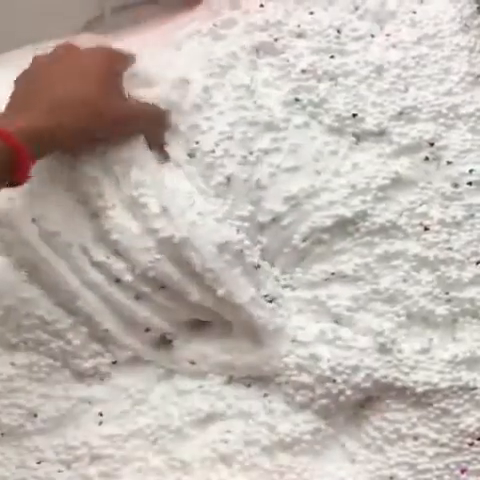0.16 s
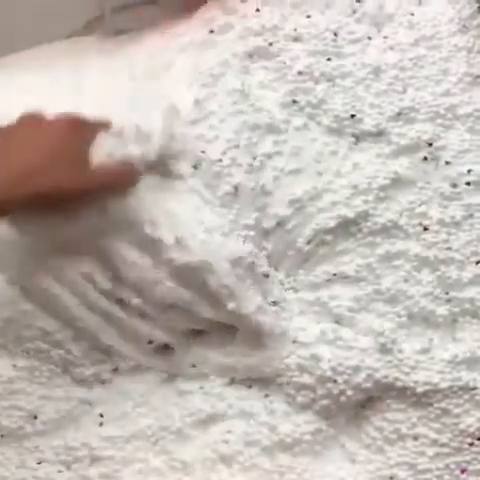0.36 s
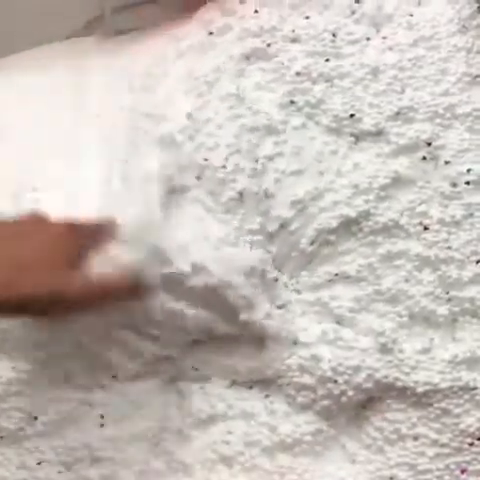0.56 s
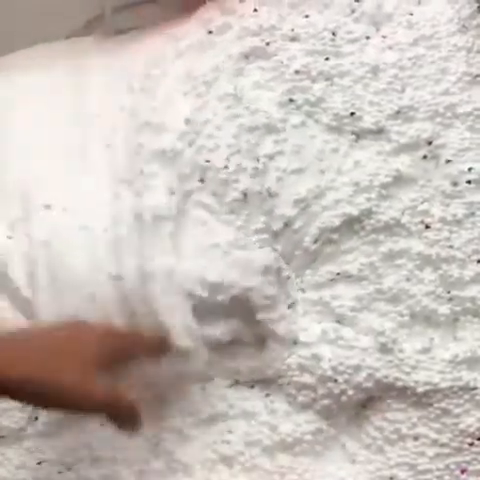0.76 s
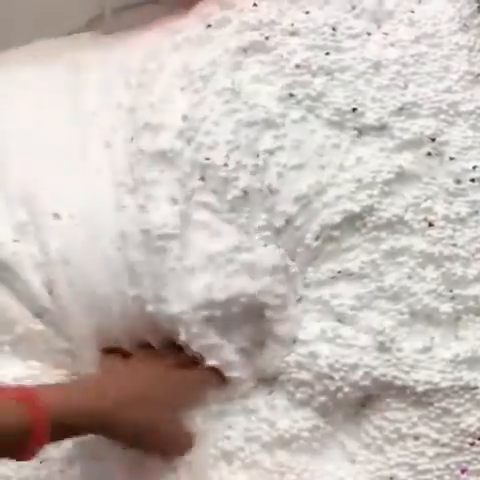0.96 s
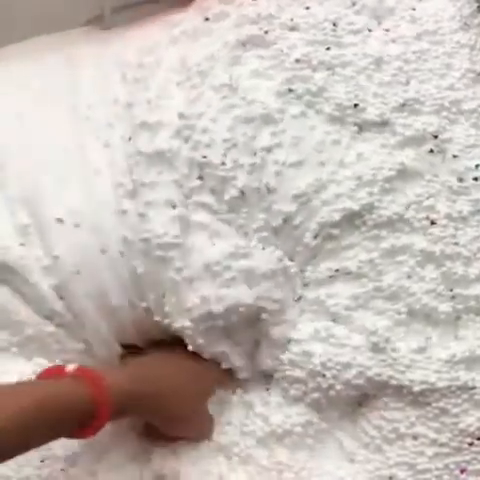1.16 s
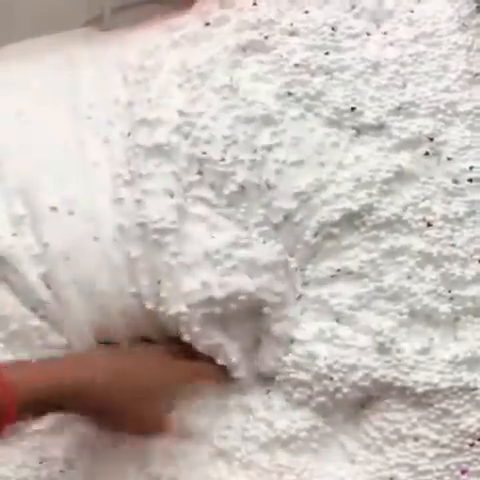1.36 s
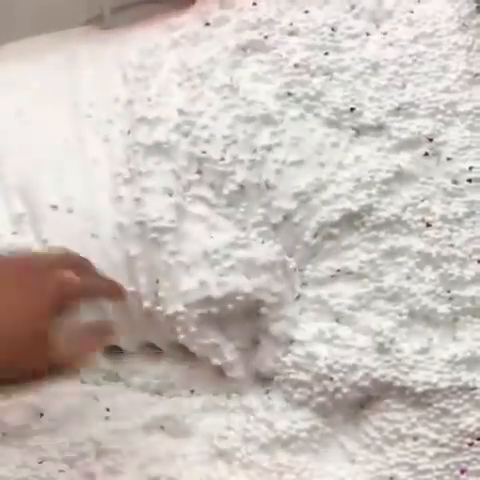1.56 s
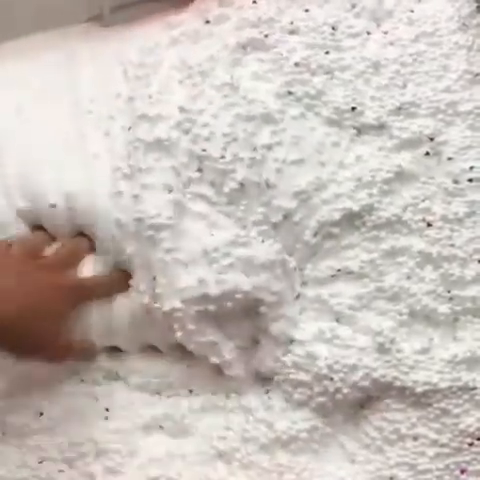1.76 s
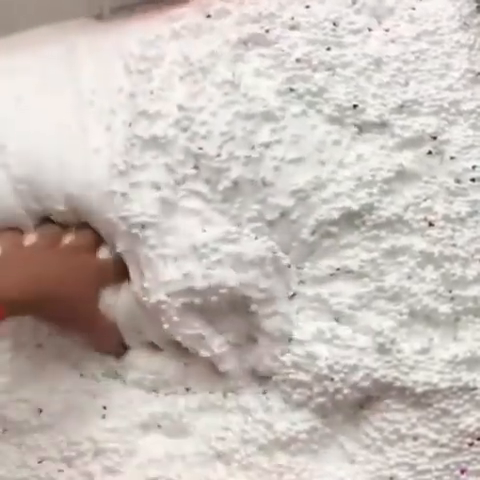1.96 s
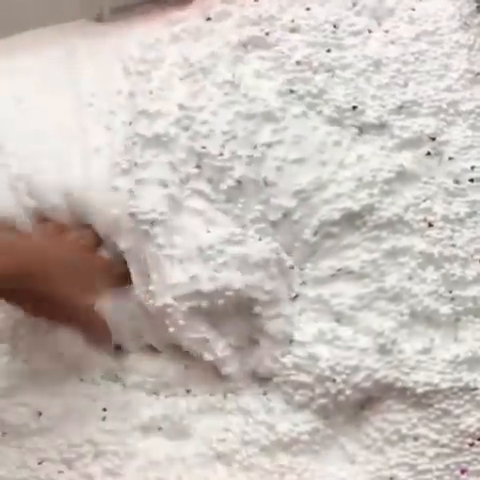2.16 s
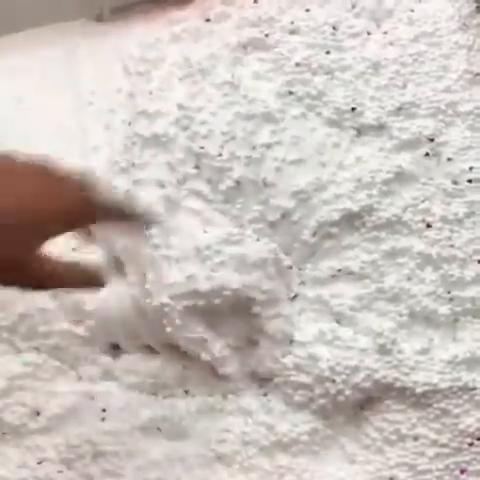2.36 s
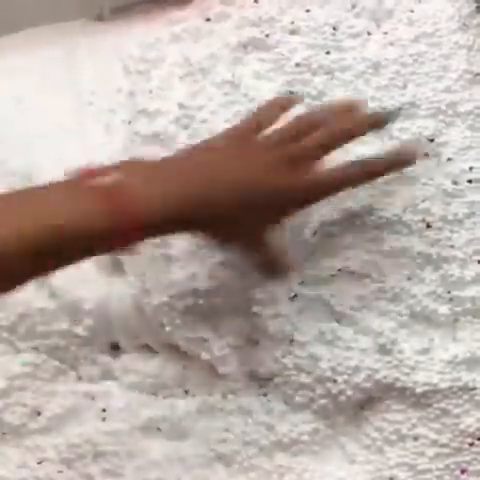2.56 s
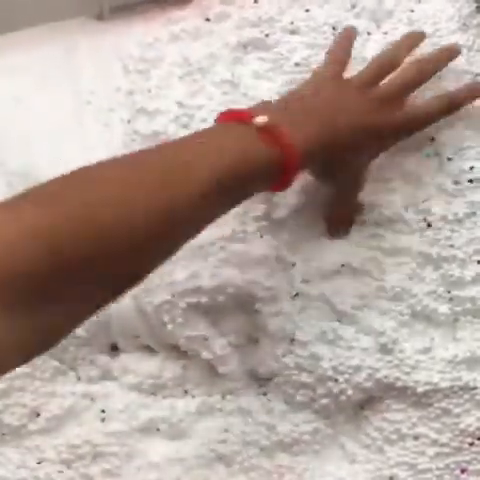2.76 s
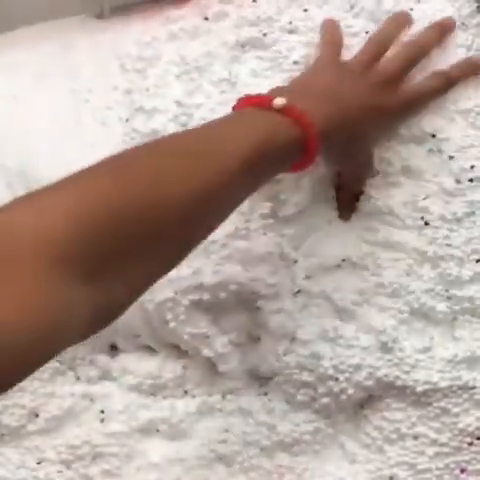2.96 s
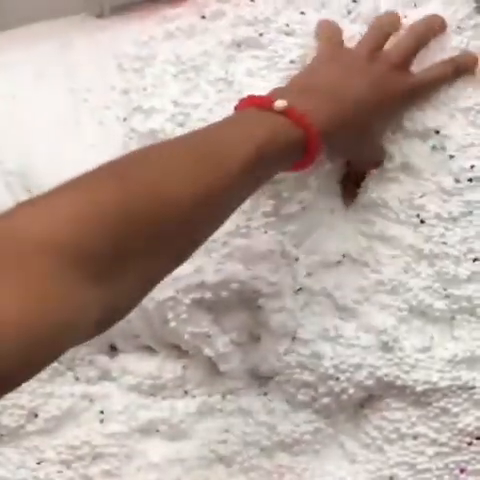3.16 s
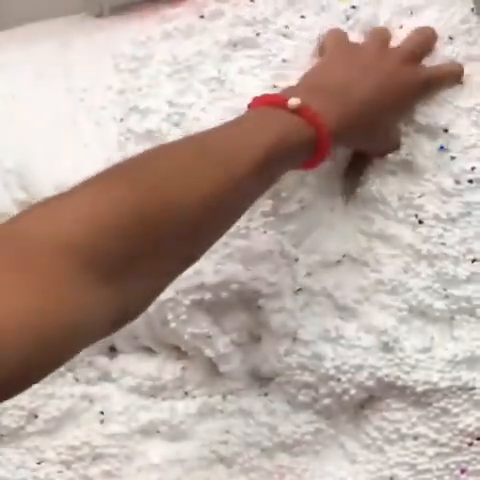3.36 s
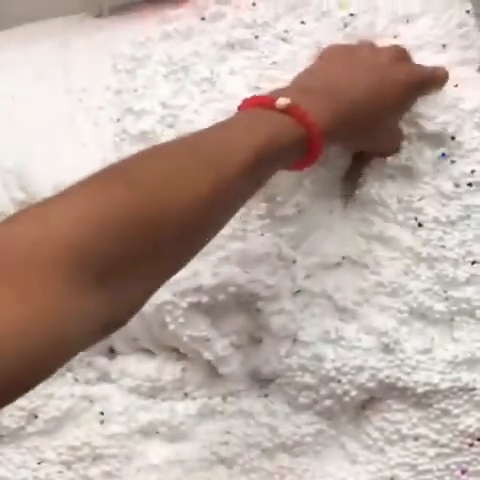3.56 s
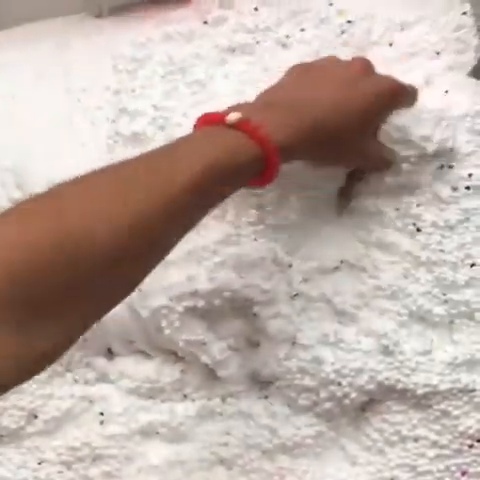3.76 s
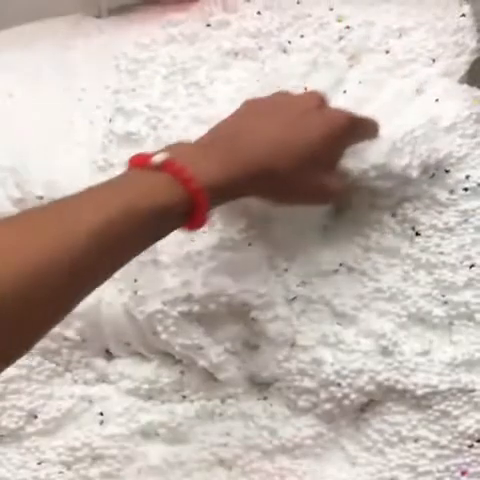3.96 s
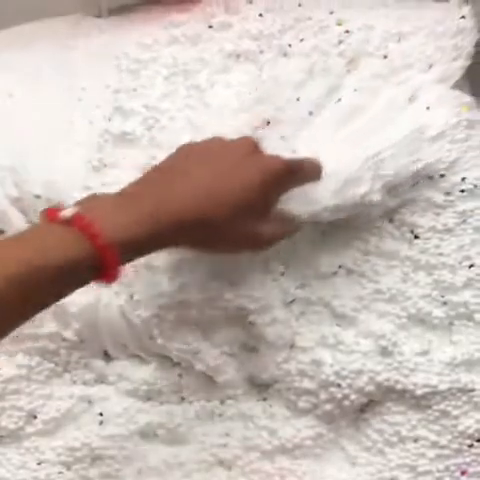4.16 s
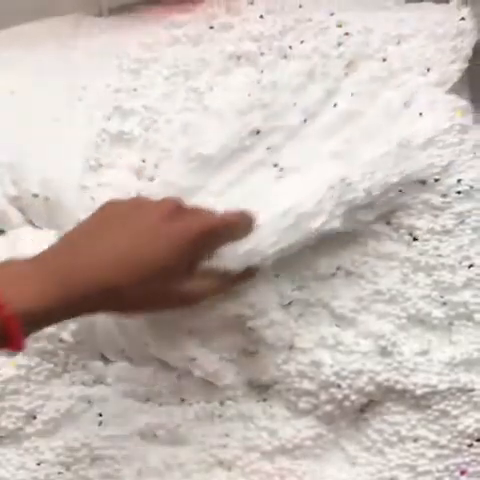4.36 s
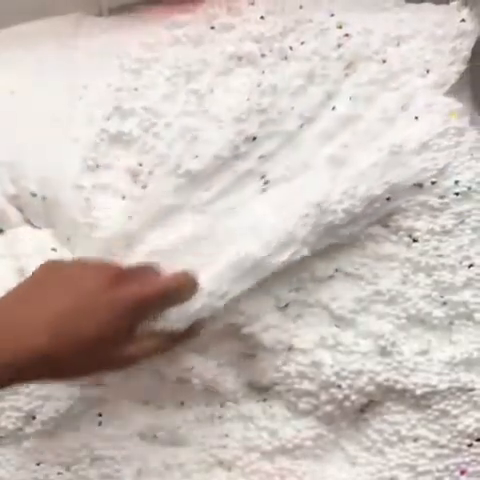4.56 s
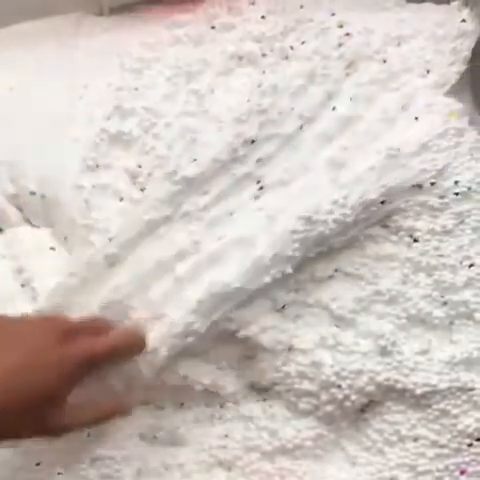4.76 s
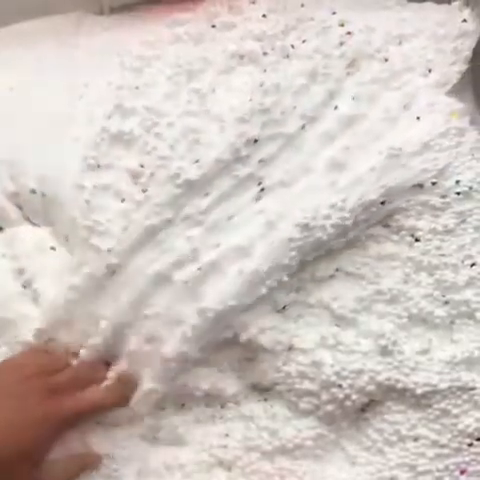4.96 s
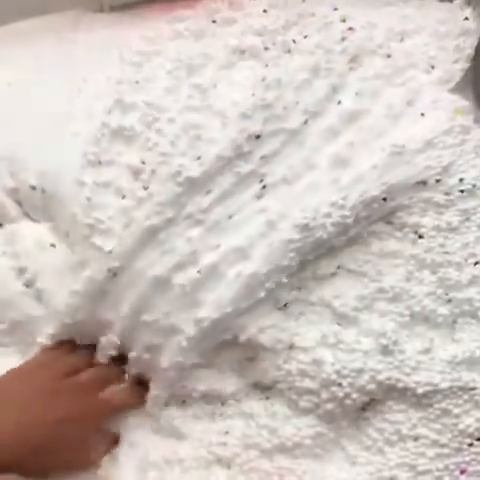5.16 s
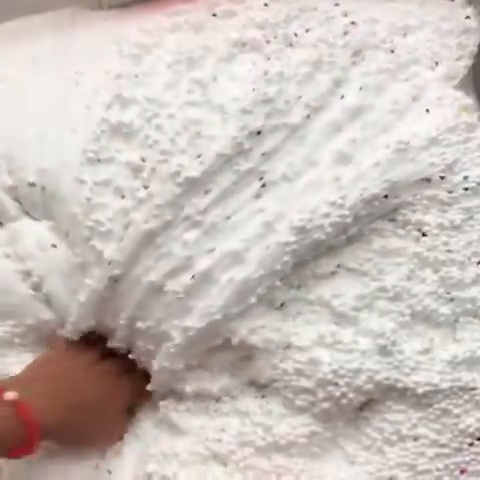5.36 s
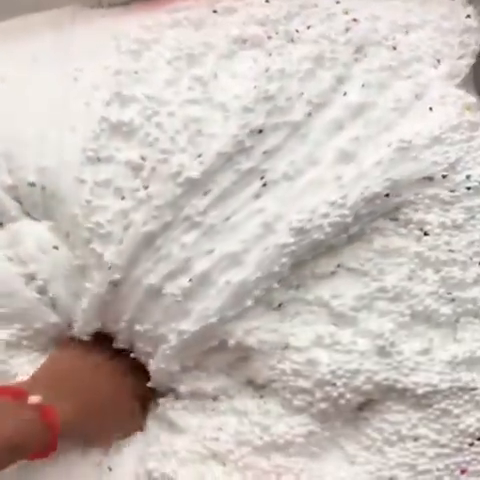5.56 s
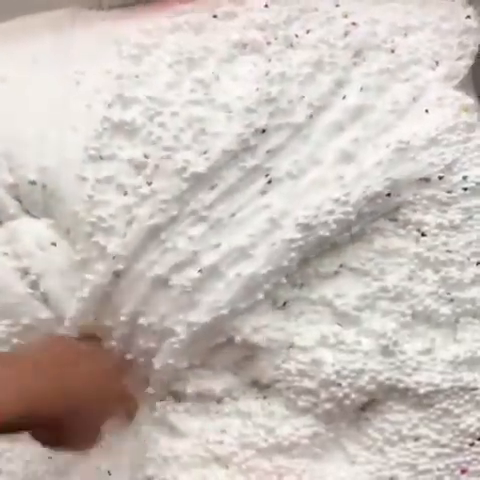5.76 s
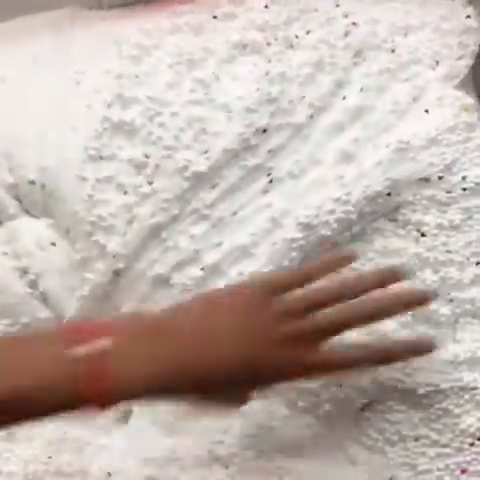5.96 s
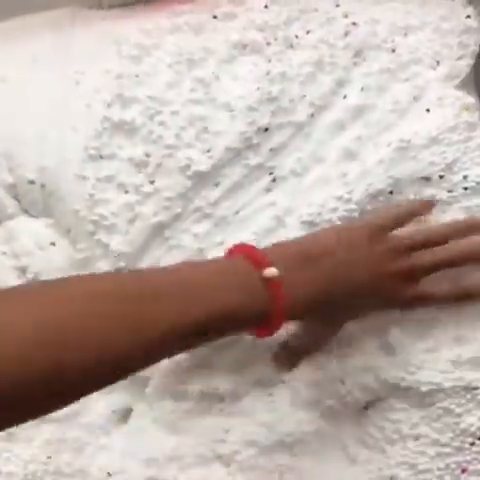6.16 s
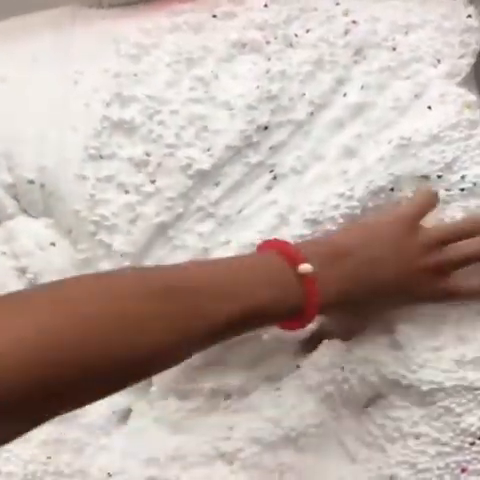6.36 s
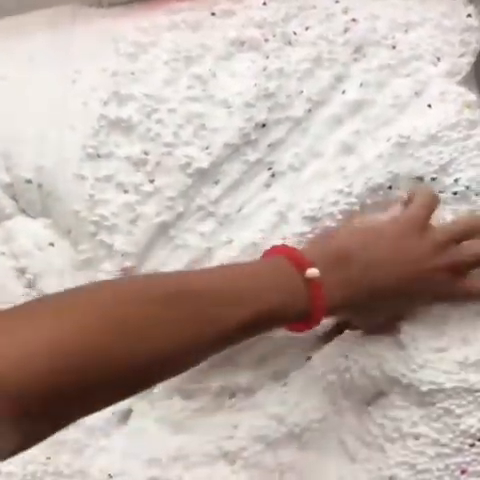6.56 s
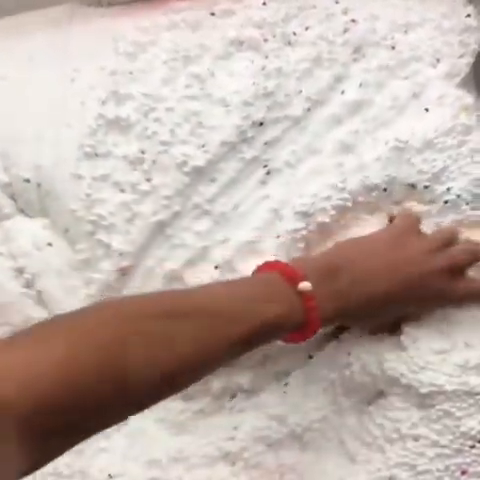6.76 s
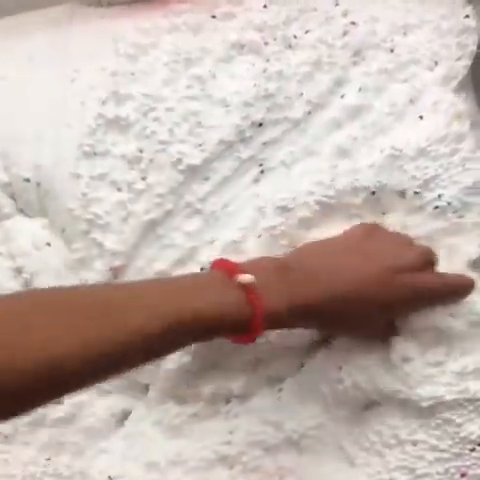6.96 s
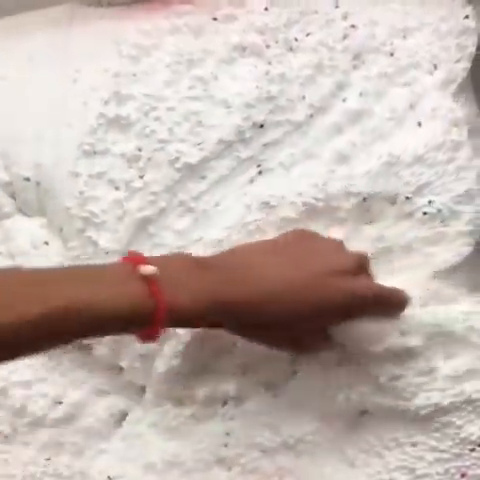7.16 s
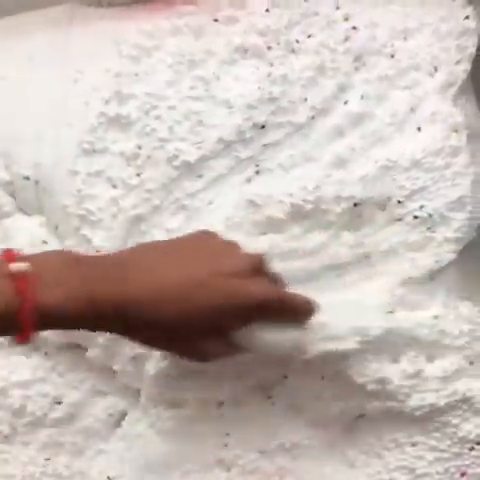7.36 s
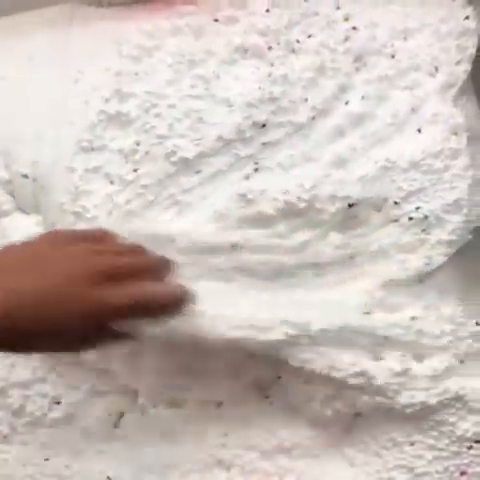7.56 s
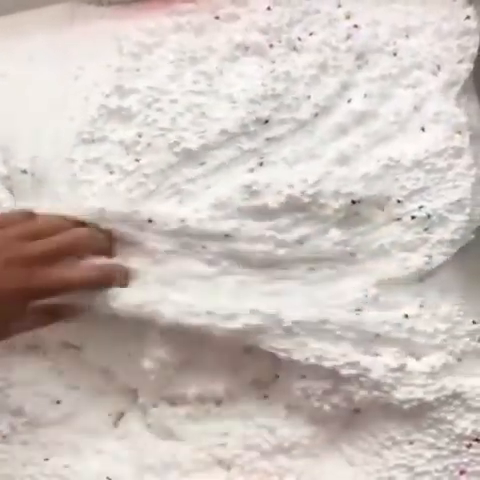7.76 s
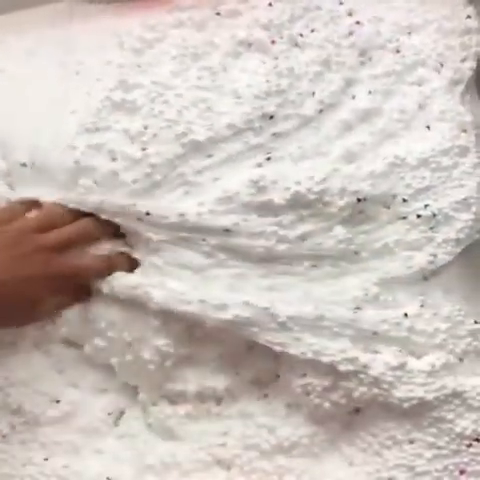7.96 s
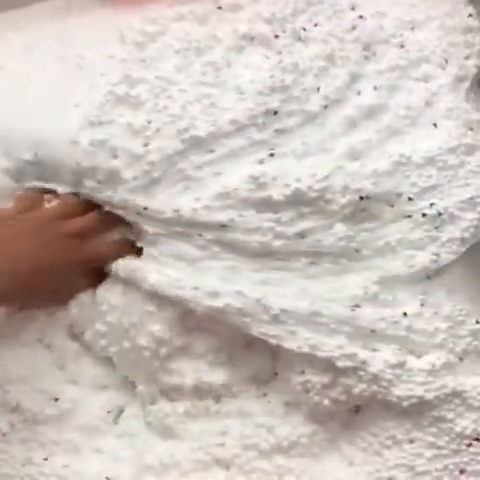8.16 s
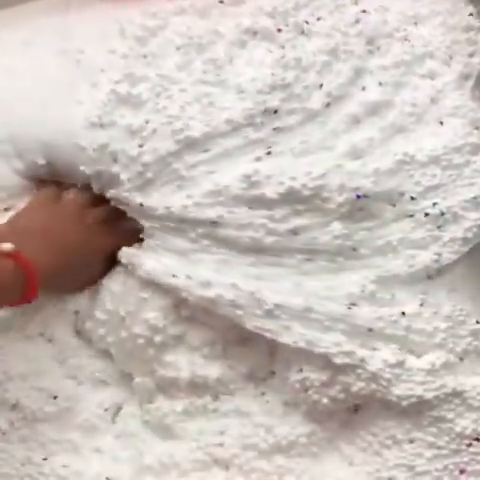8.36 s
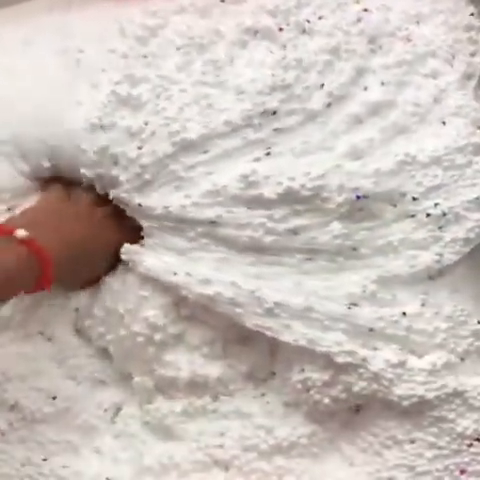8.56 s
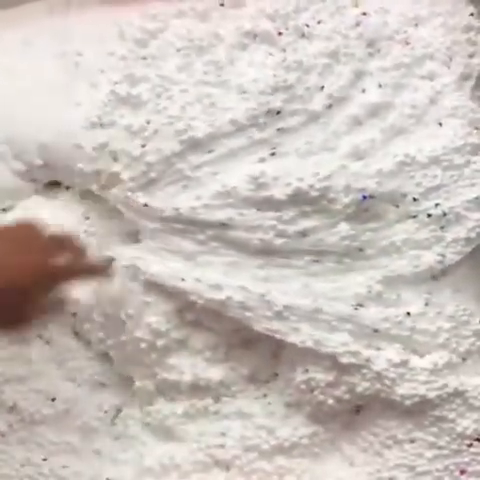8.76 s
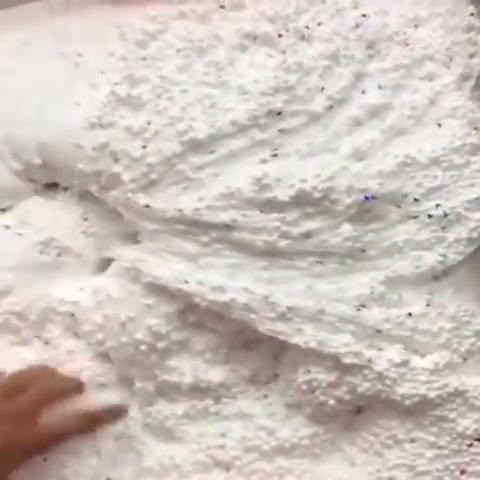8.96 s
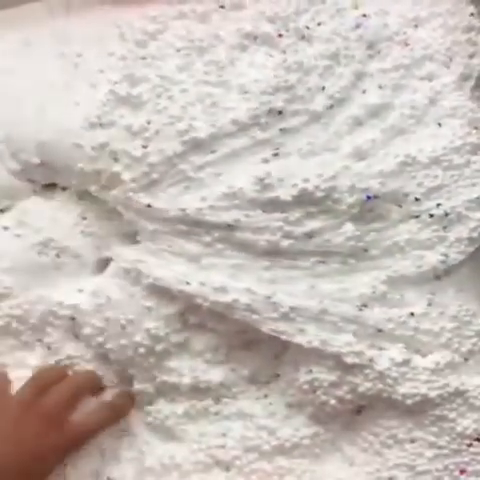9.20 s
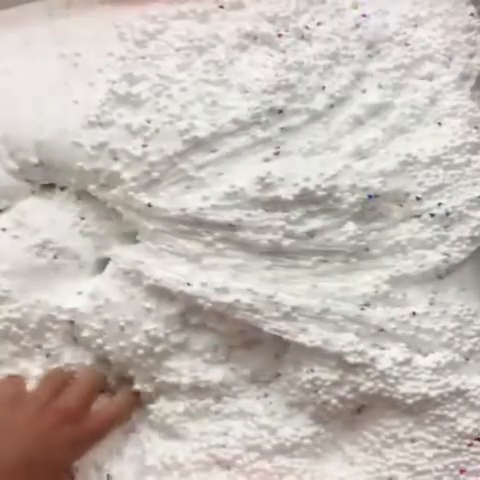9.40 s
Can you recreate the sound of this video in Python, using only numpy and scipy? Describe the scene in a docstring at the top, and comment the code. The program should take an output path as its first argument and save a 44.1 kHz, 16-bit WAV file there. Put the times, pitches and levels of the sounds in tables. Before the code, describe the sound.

Sticky foam-bead slime crackles and crunches close up as a hand drags and folds it, with loud wet pops over a faint low hum.

```python
"""Sticky foam-bead slime crackles as a hand presses, drags and folds it in a tub close to a phone microphone:
tiny air pockets burst as short dying tones, and larger ones snap as torn-film noise rings a cavity.
Fingers pull free with a squelch of gulps through resonances; the tub jolts as decaying low modes.
A small room adds sparse reflections; a motor hums as sines, and electronics add hiss and a faint whine."""
import sys
import numpy as np
from scipy import signal
from scipy.fft import rfft, irfft, next_fast_len
from scipy.io import wavfile
from scipy.ndimage import uniform_filter1d

SR = 44100
rng = np.random.default_rng(int(sys.argv[2]) if len(sys.argv) > 2 else 0)


def pcm_store(signal):
    """Save signal as 16-bit PCM."""
    levels = np.round(np.clip(np.atleast_2d(signal), -1, 1) * 32767)
    wavfile.write(sys.argv[1], SR, levels.astype(np.int16).T)


N = 415863

# How hard the slime is worked: crackle and soft kneading levels over time, in lists of rows.
# Each row: time in seconds, crackle level in dB rms, soft kneading level in dB rms.
EFFORT_LEVELS = [
    [(0.0, -67.5, -77), (0.094, -63.5, -72), (0.29, -60, -70), (0.552, -56, -76), (0.908, -59, -64.5),
     (1.044, -59.5, -71), (1.268, -64, -72), (1.47, -65, -77)],
    [(2.95, -70, -81.5), (3.116, -70, -84), (3.402, -61.5, -70), (3.54, -53, -61.5), (3.632, -45, -60.5),
     (3.72, -58, -67.5)],
    [(3.721, -51.5, -62.5), (3.905, -53.5, -64), (4.141, -54, -64.5), (4.353, -54.5, -70.5),
     (4.531, -58.5, -86), (4.6, -54.5, -71)],
    [(4.601, -62.5, -78), (4.707, -58.5, -80), (5.035, -60.5, -73), (5.247, -60.5, -67.5),
     (5.397, -51.5, -69), (5.495, -56.5, -67.5), (5.615, -59, -65), (5.77, -72.5, -75)],
    [(6.18, -81, -74), (6.256, -66, -75), (6.376, -63, -74.5), (6.566, -62, -67), (6.696, -56, -61.5),
     (6.946, -51, -59), (7.084, -52.5, -61), (7.3, -52.5, -60.5)],
    [(7.301, -54, -63), (7.477, -53.5, -65), (7.807, -53.5, -64.5), (7.933, -57, -71), (8.125, -64, -72.5),
     (8.421, -62, -72.5), (8.565, -64, -70.5), (8.63, -71, -72)],
    [(9.19, -70, -77), (9.316, -59.5, -67.5), (9.43, -49.5, -63)],
]
# Filters of the crackle and of the kneading. Each row: frequency in Hz, gain in dB.
CRACKLE_SPECTRUM = [(350, -32), (600, -15.5), (1290, 3.5), (1390, 2.5), (1940, 2.5), (3300, 5), (4960, 4.5),
                    (9920, 7), (11100, 2.5), (11500, -32), (15000, -48), (22000, -120)]
KNEAD_SPECTRUM = [(76, -59), (130, -11.5), (204, -9), (344, -2), (398, -8), (705, -12.5), (1000, -9.5),
                  (1300, -20), (2200, -120)]
# The loudest pockets that snap. Each row: time of the burst's peak in seconds, reference level in dB,
# pocket pitch in Hz, rustle and sharp tick in dB relative to the reference, length setting in ms.
LOUD_SNAPS = [(.0909, -38, 3970, 18, -11, .9), (.1933, -40.5, 1610, 4, 3, 1.76),
              (.2497, -40.5, 1340, 3.5, -10, 4.7), (.2974, -41.5, 3570, 3.5, 4, 5.7),
              (.638, -36, 1870, -10, -13, 2.1), (.667, -30, 4690, -10, -4, 4.8),
              (.76, -34.5, 3300, -7, -3, 3.4), (.9336, -36, 2060, -1, 9, 4.5),
              (.962, -41.5, 1410, 5, -3, 5), (1.0122, -31, 2360, 2, -22, 2.8),
              (1.0486, -35.5, 1240, 6.5, -2, 3.9), (1.106, -28.5, 1810, -7.5, -12, 2.7),
              (1.1665, -34, 1870, 9.5, -11, 2.04), (1.2024, -35, 1440, -2, -19, 4.2),
              (1.3336, -39, 6800, -14, 13.5, 2.3), (1.5205, -26, 2370, -9, -21, 22),
              (1.571, -17, 1400, -2.5, -13, 6.9), (1.5834, -7.5, 1430, -5, -17, 2.5),
              (1.5901, -9, 3900, -19, -20, 5), (1.5985, -26, 3600, -6.5, -17.5, 6.5),
              (1.9066, -36.5, 7160, -24, 2, 1.25), (1.976, -35.5, 6860, 1, 0, 1.54),
              (2.1563, -33.5, 3020, 2.5, -3, 1.76), (2.176, -40, 7040, -10, 3, 3.7),
              (2.303, -29, 1300, -22, -13, 2.8), (2.3388, -9.5, 3000, -4, -15, 2.47),
              (2.3475, -21, 2410, -4, -17, 5.8), (2.3556, -17.5, 2820, 5, -25, 8),
              (2.378, -22.5, 1264, -4, -16, 8.8), (2.9268, -37.5, 6100, -11, 8, 1.3),
              (2.9372, -34, 3730, -2.5, 3.5, 2), (2.9636, -42, 7000, -20, 15.5, 1.66),
              (3.1121, -48.5, 1700, 4, 16.5, 3.7), (3.3617, -38, 4730, 0, 6.5, 4.8),
              (3.418, -38, 5400, -16, 10, 2.7), (3.4665, -37.5, 4120, -10, 14.5, 2.14),
              (3.695, -34.5, 6160, -12, 11, 2.5), (3.7744, -43.5, 1730, -3, 19, 3.2),
              (3.8388, -24.5, 6800, 0, 5, 2.1), (3.9002, -30.5, 5400, -1, -12, 1.4),
              (4.0023, -31.5, 6360, -15, 0, 3.3), (4.0816, -24.5, 6600, -32, -7, 4.2),
              (4.162, -30.5, 6590, -9, 5, 1.9), (4.187, -27.5, 3420, -14, -16, 4.1),
              (4.2536, -36, 6460, -7, 9, 5.1), (4.3292, -40.5, 3420, -12, 20.5, 2.8),
              (4.4215, -39.5, 2140, 4, 14.5, 7.8), (4.568, -41, 4520, -9, 10, 3.9),
              (4.9006, -40.5, 1940, 6, 3, 1.97), (5.0178, -45.5, 3585, -5, 16.5, 1),
              (5.055, -42, 4000, -1, 4, 9.4), (5.1477, -35, 5354, -5, 6, 1.4),
              (5.2036, -29.5, 1900, 2.5, -3, 3.5), (5.2167, -36, 2870, -4, -11, 4.1),
              (5.263, -40, 2500, -2, -1, 8), (5.326, -31.5, 1900, 2, -15, 1.8),
              (5.354, -29, 1850, -11, -18, 4.8), (5.4028, -27.5, 3170, 1, -3, 1.9),
              (5.4224, -33, 2470, 0, 4.5, 3), (5.5042, -29, 3460, -1.5, -13, 2),
              (5.513, -39, 4450, -7, 9, 3), (5.5618, -27.5, 3400, -11, -19, 2.2),
              (5.8888, -27, 1560, -16, -21, 11), (5.9015, -26, 1400, -7, -23, 6.02),
              (6.187, -49, 5000, -5, 0, 3.6), (6.2246, -30.5, 3800, 3, -12, 4.9),
              (6.29, -46, 4000, -3, 3, 5), (6.3486, -29.5, 3400, -1.5, 4, 1.9),
              (6.512, -37.5, 4030, -6, 10, 2.2), (6.614, -26, 7460, -6, 6, 1.28),
              (6.7687, -26.5, 1480, 4.5, 5.5, 2.9), (6.7926, -40, 1030, -6, 5, 1.7),
              (6.8376, -34, 1430, -6, -11, 6.9), (6.858, -24, 1400, -15, -21, 5.4),
              (6.8746, -29.5, 6650, -8, 15, 2.1), (6.8839, -34.5, 1760, 1, 2, 9.4),
              (6.9303, -38, 1940, 4, -6, 3.1), (6.971, -37, 1190, -11, -2, 3.5),
              (7.1195, -29, 2340, -6, -3, 4.8), (7.1271, -37.5, 3660, 4, -9, 6),
              (7.1456, -32, 2170, 0, -1, 5.5), (7.2645, -43, 3920, -9, 11, 1.3),
              (7.272, -30.5, 3700, -5, 3, 8.6), (7.3942, -44, 6760, -13, 3, 1.8),
              (7.475, -27, 4400, -6.5, -14, 4.6), (7.5124, -21, 3400, -9, -25, 1.53),
              (7.6391, -34, 6980, -12, 5, 1.8), (7.8377, -21, 3160, -2, 5, .9),
              (8.008, -36, 1990, 3, 2, 3.6), (8.0424, -36, 6740, -13, 9, 2.1),
              (8.0743, -35.5, 6630, -7, 3, 3.6), (8.1324, -31, 6900, -2.5, 0.5, 3.2),
              (8.2511, -32, 3100, -12, -20, 2.4), (8.3809, -37, 5770, -4, 0, 1.8),
              (8.557, -30, 6500, -13, 6.5, 2.57), (8.7772, -32.5, 1210, -6.5, -21, 2.25),
              (8.8111, -24, 1250, -9.5, -15, 4.4), (8.8429, -30, 1255, -19, -17, 3.2),
              (9.1417, -28, 860, -15, -12.5, 8.8), (9.157, -34, 3500, 0, 4, 2.1),
              (9.187, -40, 4500, 0, 2, 1.8), (9.229, -46, 3500, 3, -3, 1.8),
              (9.2864, -44.5, 4870, 2, -10, 3), (9.363, -36.5, 5510, 0, 0, 4),
              (9.3793, -30.5, 5800, 1, 4, 3.7)]
# Filter of the wet rustle in a snap. Each row: frequency in Hz, gain in dB.
RUSTLE_SPECTRUM = [(900, -25.5), (2200, -16.5), (4000, -5.5), (6000, -10), (9000, -16.5)]
BODY_DB = -3.5  # pocket tone relative to the reference level
POCKET_WIDTH = 0.47  # resonance width as a share of the pitch
RING_MS, RISE_SHARE = 1.2, .22  # the rise is this share of the length left after the ringing
FIZZ_DB, FIZZ_T60_S = -25.5, .07
# Smaller snaps: events per second, level above the crackle and its random spread, pitch range,
# length scale in ms (multiplied by .3 to 1.3 at random), highest rustle and tick levels.
SMALL_PER_S, SMALL_DB, SMALL_SPREAD_DB, SMALL_LOW_HZ, SMALL_HIGH_HZ = 45, 7., 7.5, 1180, 6840
SMALL_MS, SMALL_RUSTLE_DB, SMALL_TICK_DB = 4.57, 2, 2
# Fingers pulling free. Each row: start in seconds, swell in seconds, hold in seconds,
# gurgle level in dB, spray in dB relative to it, tub ringing in dB relative to it.
FINGER_PULLS = [(1.458, 0.063, .003, -47.5, 0, -5.5), (1.561, 0.019, 0.0029, -36, 3, -1),
                (2.276, .058, 0.0029, -63.5, 14.5, -3), (2.298, .003, .008, -48.5, -21, 4),
                (2.333, .004, 0.035, -42, 4, 3), (5.775, 0.042, 0.069, -51, -3, -13),
                (5.886, 0.0029, .012, -41, -5, -9.5), (6.002, 0.013, 0.025, -66.5, 5.5, 2),
                (8.729, .046, 0.026, -50, 2, -11.5), (8.809, 0.0031, 0.036, -45, -3, -6),
                (9.137, .003, .01, -51.5, -9, 4), (9.147, .008, 0.032, -63.5, 11.5, -7)]
# Air resonances of the finger holes, passed twice. Each row: frequency in Hz, width and level per pass
# in Hz and dB.
HOLE_MODES = [(815, 150, -1), (1380, 270, 7), (1900, 1100, 5.5)]
# Resonances of the tub. Each row: frequency in Hz, width in Hz, level in dB.
TUB_MODES = [(273, 46.8, 4), (352, 27, 11.5), (453, 22, 9.5), (559, 37, 11), (670, 93, -1)]
# Filter of the wet spray. Each row: frequency in Hz, gain in dB.
SPRAY_SPECTRUM = [(1060, -42.5), (1800, -2), (3300, -4.5), (4100, -3.5), (4960, -10), (5360, -8),
                  (9470, -10), (11300, -19.5), (14700, -58), (22000, -120)]
SWELL_DB, TAIL_S = 19, .1
GURGLE_FADE_DB_PER_S, SPRAY_FADE_DB_PER_S, TUB_FADE_DB_PER_S = 500.5, 389.5, 402
# Modes of the tub on the table. Each row: frequency in Hz, level in dB, decay by 60 dB in seconds.
TABLE_MODES = [(99.3, 0, 0.171), (145, -1.5, 0.14), (340, 0, 0.053)]
# The tub jolts against the table. Each row: time in seconds, level setting in dB,
# hardness in dB per octave above the lowest mode.
TUB_JOLTS = [(1.59, -44.5, 12.5), (2.34, -50.5, 16), (2.365, -32, -11), (4.01, -70, 15.5),
             (4.029, -69, 13.5), (5.909, -38, -8.5), (7.2, -53, -7), (8.81, -51, 6.5), (8.851, -49, -7),
             (9.14, -60.5, 14.5)]
# Decay of the reflections. Each row: frequency in Hz, decay by 60 dB in seconds.
ROOM_DECAY = [(300, .16), (1000, 0.1427), (3000, 0.12), (9000, 0.11)]
# The wavering motor hum. Each row: time in seconds, fundamental in dB rms, its octave in dB rms.
HUM_LEVELS = [(0.0, -63.5, -74), (0.68, -60.5, -75), (1.0, -62.5, -68.5), (2.23, -62, -73),
              (3.49, -67, -84), (4.18, -65.5, -75), (4.49, -66.5, -70), (5.28, -61, -70),
              (6.91, -63.5, -75.5), (7.4, -61.5, -72), (7.8, -63.5, -67), (8.3, -61.5, -86),
              (8.72, -61.5, -66), (9.43, -65.5, -84.5)]
HUM_HZ = 59.1
# Thin whine of the electronics. Each row: frequency in Hz, level in dB rms.
WHINE_TONES = [(1001, -86.5), (2003, -89), (2998, -91.5), (4000, -89), (5001, -98.5), (5997, -92),
               (6998, -98.5), (8000, -87)]
# Filter of the steady hiss. Each row: frequency in Hz, gain in dB.
HISS_SPECTRUM = [(15, -24.5), (30, 0), (45, 6), (80, 1.5), (150, -0.5), (300, -7.5), (500, -4.5),
                 (700, -14), (1200, -14.5), (2500, -18.5), (5000, -20.5), (8000, -20.5), (11500, -20.5)]
HISS_DB = -67.5  # rms above 150 Hz
EDGE_HZ = 10970  # upper band limit of the recorder


def crackle():
    """Superposition of impulses: many tiny pockets of all sizes burst as slime stretches over soft kneading."""
    t = np.arange(N) / SR
    level_db, knead_db, working = effort(t)
    pops = np.zeros(N)
    for hz in np.linspace(800, 10800, num=16):
        burst = pocket(hz, 1.3, 200) * np.sqrt(hz)
        pops += signal.oaconvolve(grains(N, 100., 2.3), burst)[:N]
    fizz = evened(pops) + .6 * rng.standard_normal(N)
    fizz = patchy(coloured(fizz, CRACKLE_SPECTRUM), patchy_db=2.5, shared_db=2.5)
    knead = coloured(grains(N, 500., 3.), KNEAD_SPECTRUM)
    knead = patchy(knead, patchy_db=2.5, shared_db=1.0)
    smooth_edges = uniform_filter1d(working * 1., size=900)
    return smooth_edges * (gain_of(level_db) * fizz + gain_of(knead_db) * knead)


def pocket(hz, cycles, size):
    """Damped cavity oscillation: a bursting pocket gives a few dying cycles that rise slightly in pitch."""
    turns = np.arange(size) * hz / SR
    return np.sin(2 * np.pi * (turns + 0.008 * turns ** 2)) * np.exp(-3 * turns / cycles)


def effort(t):
    """Forcing by the hand: crackle and kneading levels in dB, and whether the hand is working."""
    working = sum((t >= rows[0][0]) & (t <= rows[-1][0]) for rows in EFFORT_LEVELS)
    return *columns(sum(EFFORT_LEVELS, []), t), working


def patchy(x, patchy_db, shared_db):
    """Intermittency: crunches come in clumps, some across all pitches, some in one patch of the spectrum."""
    z = signal.stft(x, nperseg=256, noverlap=192)[2]
    field = rng.standard_normal((z.shape[0] + 1, z.shape[1]))
    patches = uniform_filter1d(field[1:], size=14, axis=0)
    patches = evened(uniform_filter1d(patches, size=9, axis=1))
    # a clump starts suddenly and trails off
    shared = signal.lfilter([1], [1, -.93], np.maximum(field[0] - 1.4, 0))
    shared = evened(shared - shared.mean())
    z = z * gain_of(patchy_db * patches + shared_db * shared)
    return evened(signal.istft(z, nperseg=256, noverlap=192)[1][:len(x)])


def snaps(rows):
    """Excited resonance: a burst of tearing film rings its pocket, with a wet rustle and a sharp tick."""
    out, t = np.zeros(N), np.arange(2200) / SR
    high = signal.butter(3, 6000, "highpass", fs=SR)
    noise = rng.standard_normal((len(rows), 3, len(t)))
    for row, (body_noise, tick_noise, rustle_noise) in zip(rows, noise):
        s, db, hz, rustle_db, tick_db, ms = row
        rise = max(ms - RING_MS, .2) * RISE_SHARE / 1000
        burst = t / rise * np.exp(1 - t / rise)
        # the torn film keeps fizzing
        burst += gain_of(FIZZ_DB - 60 * t / FIZZ_T60_S) * np.minimum(t / rise, 1)
        mode = [(hz, POCKET_WIDTH * hz, 0)]
        body = ring(ring(body_noise * burst, mode), mode)
        rustle = coloured(rustle_noise, RUSTLE_SPECTRUM) * burst
        tick = signal.lfilter(*high, tick_noise * burst)
        parts = [(body, BODY_DB), (rustle, rustle_db), (tick, tick_db)]
        snap = sum(gain_of(db + share_db) * x / abs(x).max() for x, share_db in parts)
        add(out, s - rise - .0003, snap)
    return out


def small_snaps():
    """Poisson process: smaller pockets snap at random moments while the hand works, as rows like LOUD_SNAPS."""
    when, size, pitch, wet, tick, length = rng.random((450, 6)).T
    s = .02 + np.cumsum(-np.log(1 - when)) / SMALL_PER_S
    level_db, _, working = effort(s)
    db = level_db + SMALL_DB + SMALL_SPREAD_DB * size
    hz = SMALL_LOW_HZ * (SMALL_HIGH_HZ / SMALL_LOW_HZ) ** pitch
    rustle_db = SMALL_RUSTLE_DB - 12 * wet
    tick_db = SMALL_TICK_DB - 16 * tick
    rows = np.transpose([s, db, hz, rustle_db, tick_db, SMALL_MS * (.3 + length)])
    return rows[working > 0]


def pull(start, swell, hold, db, spray_db, tub_db):
    """Suction release: uneven gulps ring the finger holes and the tub, then swell, hold and fade."""
    t = np.arange(0, swell + hold + TAIL_S, 1 / SR)
    level_db = db - SWELL_DB * np.maximum(1 - t / swell, 0)
    after = np.maximum(t - swell - hold, 0)
    gulps = evened(grains(len(t), 600., 3.8))
    droplets = evened(grains(len(t), 3000., 2.2))
    spray = evened(coloured(droplets + .5 * gulps, SPRAY_SPECTRUM))
    gurgle = ring(ring(gulps, HOLE_MODES), HOLE_MODES)
    sound = (gain_of(-GURGLE_FADE_DB_PER_S * after) * gurgle
             + gain_of(spray_db - SPRAY_FADE_DB_PER_S * after) * spray
             + gain_of(tub_db - TUB_FADE_DB_PER_S * after) * ring(gulps, TUB_MODES))
    return start, gain_of(level_db) * sound * signal.windows.tukey(len(t), .04)


def thud(db, hardness_db):
    """Modal impact: low modes swell over about two cycles and die; a hard jolt favours the upper ones."""
    t = np.arange(SR // 4) / SR
    out = np.zeros(len(t))
    for hz, mode_db, t60 in TABLE_MODES:
        tilt_db = hardness_db * np.log2(hz / TABLE_MODES[0][0])
        envelope = gain_of(db + mode_db + tilt_db - 60 * t / t60) * (1 - np.exp(-t * hz / 0.68))
        out += envelope * np.sin(2 * np.pi * hz * t)
    return out


def room(x):
    """Reverberant decay: sparse reflections of random sign, each band dying at its own speed."""
    taps = np.zeros(SR // 2)
    at = np.arange(60, len(taps) - 20, 12)
    taps[at + rng.integers(0, 12, len(at))] = rng.choice([-1., 1.], len(at))
    hz, t, z = signal.stft(taps, SR, nperseg=128)
    decay = gain_of(-60 * t / read(ROOM_DECAY, hz)[:, None])
    tail = signal.istft(z * decay, SR, nperseg=128)[1]
    return signal.oaconvolve(x, tail / np.linalg.norm(tail))[:N]


def background():
    """Harmonic and broadband noise: wavering motor hum with its octaves, a thin whine and steady hiss."""
    t = np.arange(N) / SR
    db, octave_db = columns(HUM_LEVELS, t)
    turn = 2 * np.pi * HUM_HZ * t
    hum = gain_of(db) * np.sin(turn) + gain_of(octave_db) * np.sin(2 * turn)
    hum += gain_of(-82.0) * np.sin(4 * turn)
    whine = sum(gain_of(tone_db) * np.sin(2 * np.pi * hz * t) for hz, tone_db in WHINE_TONES)
    hiss = coloured(rng.standard_normal(N), HISS_SPECTRUM)
    scale = np.std(above(hiss, 150))
    return np.sqrt(2) * (hum + whine) + gain_of(HISS_DB) * hiss / scale  # root 2 turns rms into peak


def gain_of(db):
    """Logarithmic level: decibels to amplitude."""
    return 10 ** (np.asarray(db) / 20)


def evened(x):
    """Normalisation by mean power: scales to rms 1."""
    return x / np.sqrt(np.mean(x ** 2) + 1e-20)


def read(points, hz):
    """Logarithmic pitch scale: reads a table along log frequency."""
    f, value = np.transpose(points)
    return np.interp(np.log(hz + 1), np.log(f + 1), value)


def columns(rows, t):
    """Linear interpolation: every control column at the times t."""
    s, *rest = np.transpose(rows)
    return [np.interp(t, s, c) for c in rest]


def add(mix, s, sound):
    """Superposition: mixes a sound in at second s."""
    part = mix[round(s * SR):][:len(sound)]
    part += sound[:len(part)]


def coloured(x, spectrum):
    """Spectral filtering: weights each frequency of x by a gain in dB."""
    size = next_fast_len(len(x))
    gain = gain_of(read(spectrum, np.fft.rfftfreq(size, 1 / SR)))
    return irfft(rfft(x, size) * gain, size)[:len(x)]


def ring(x, modes):
    """Damped resonance: x excites a few modes, each a complex one-pole filter."""
    out = np.zeros(len(x))
    for hz, width, db in modes:
        pole = np.exp((2j * np.pi * hz - np.pi * width) / SR)
        out += gain_of(db) * signal.lfilter([1 - abs(pole)], [1, -pole], x + 0j).imag
    return evened(out)


def grains(count, per_s, spread_db):
    """Random impulses: sparse clicks of random sign; most are small, a few large."""
    chance, sign, size = rng.random((3, count))
    size_db = spread_db * np.minimum(-np.log(size + 1e-9), 4)
    return (chance < per_s / SR) * np.sign(sign - .5) * gain_of(size_db)


def above(x, hz):
    """High-pass filtering: a steep cut below hz."""
    return signal.sosfilt(signal.butter(4, hz, "highpass", fs=SR, output="sos"), x)


def scene():
    """Direct and reflected sound: the slime, its reflections and the room's background."""
    tugs = np.zeros(N)
    for row in FINGER_PULLS:
        add(tugs, *pull(*row))
    # the snaps and pulls carry no deep bass
    hand = above(snaps(LOUD_SNAPS) + snaps(small_snaps()), 600) + above(tugs, 140)
    for s, *blow in TUB_JOLTS:
        add(hand, s, thud(*blow))
    fine = crackle()
    reflections = room(gain_of(-8.0) * hand + gain_of(-7.5) * fine)
    return (hand + fine + reflections + background())[None]


def record(dry):
    """Low-pass filtering: the band limit of the recorder."""
    lowpass = signal.firwin(255, EDGE_HZ, window=("kaiser", 6), fs=SR)
    return signal.oaconvolve(dry, lowpass[None], "same")


dry = scene()
out = record(dry)
pcm_store(out)
```